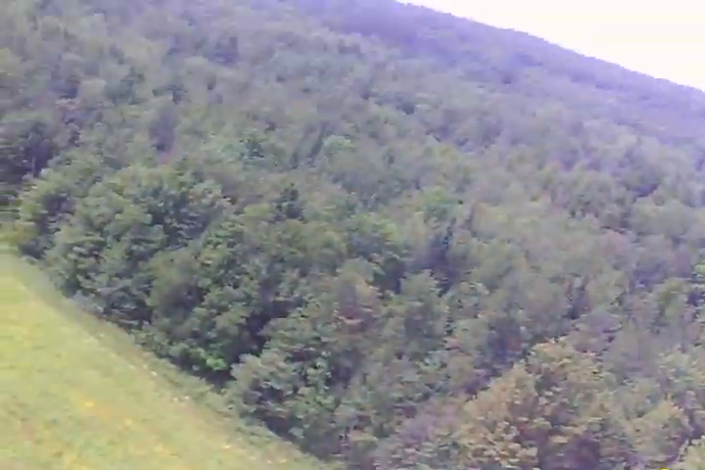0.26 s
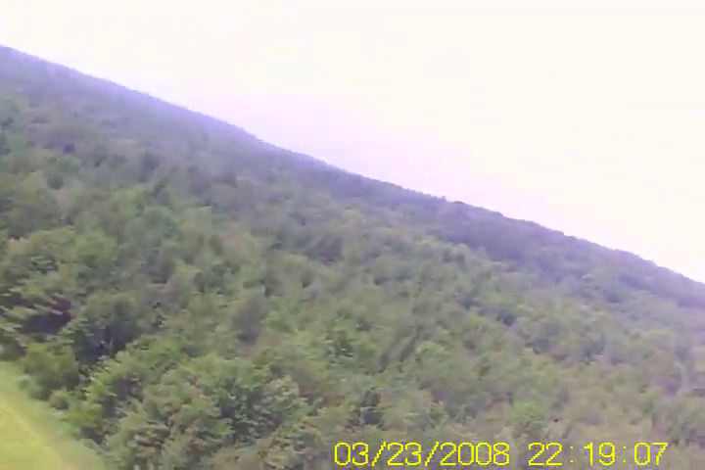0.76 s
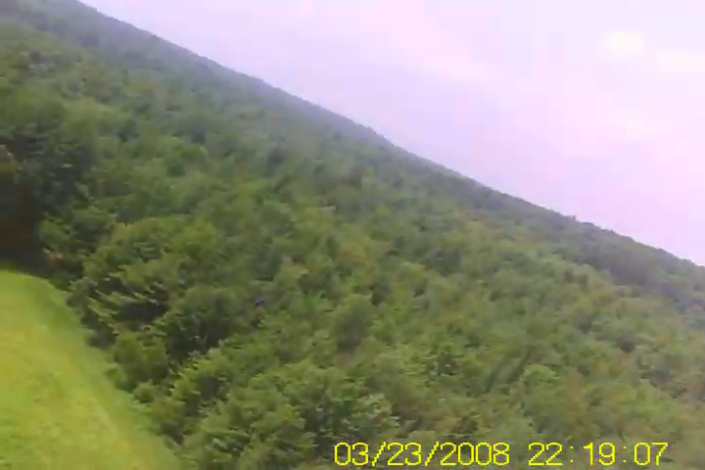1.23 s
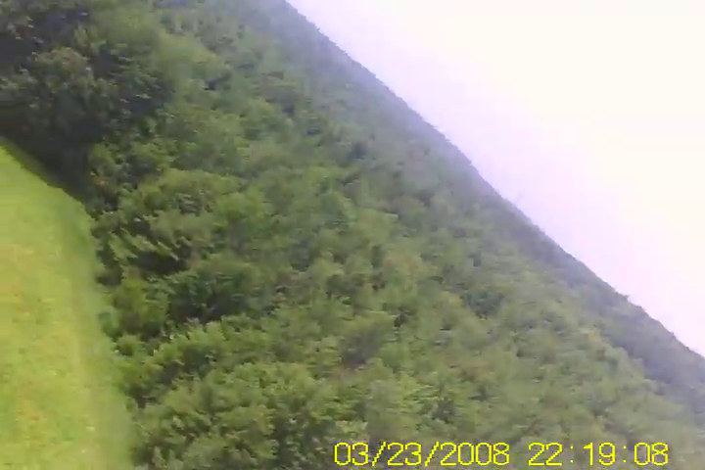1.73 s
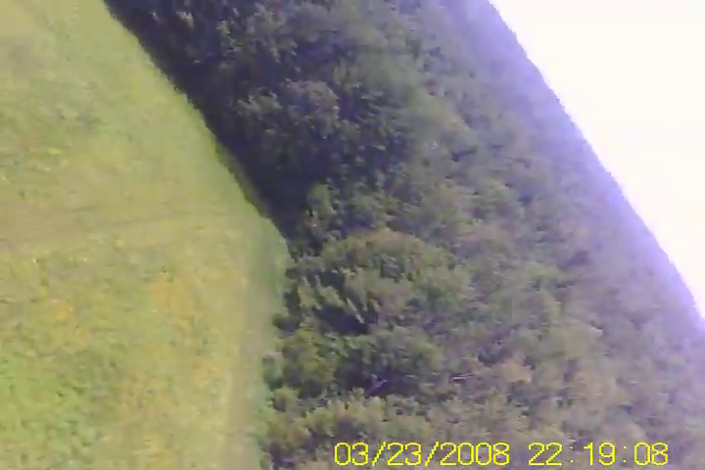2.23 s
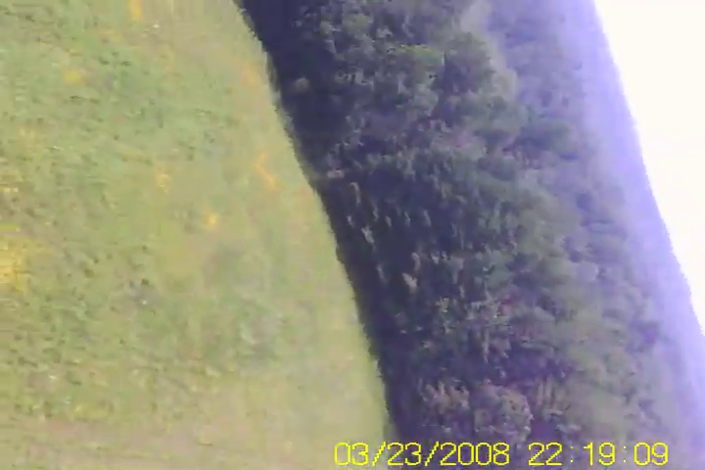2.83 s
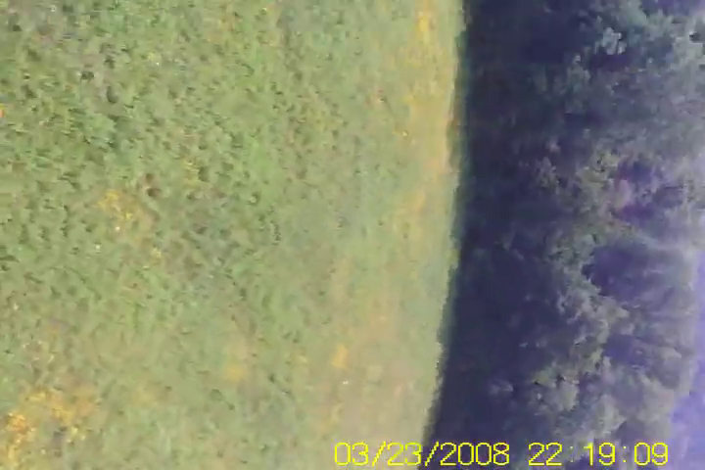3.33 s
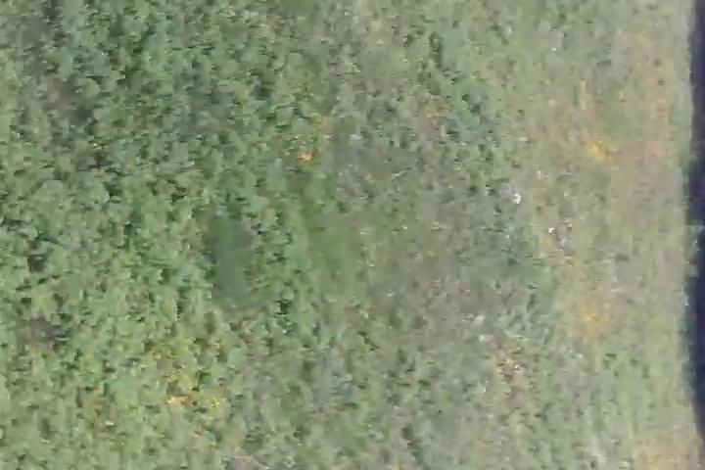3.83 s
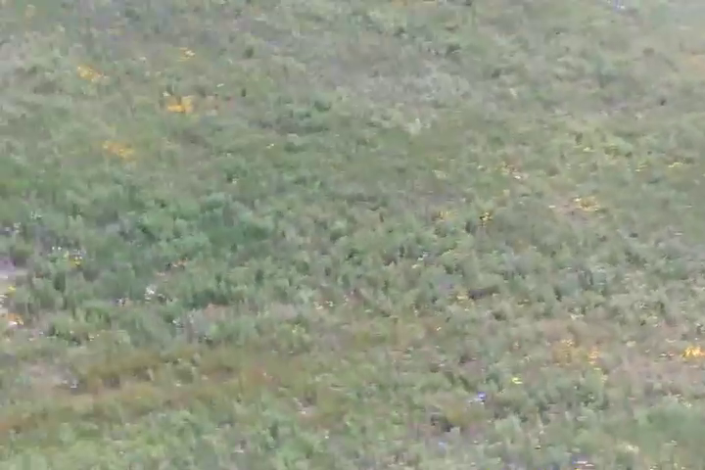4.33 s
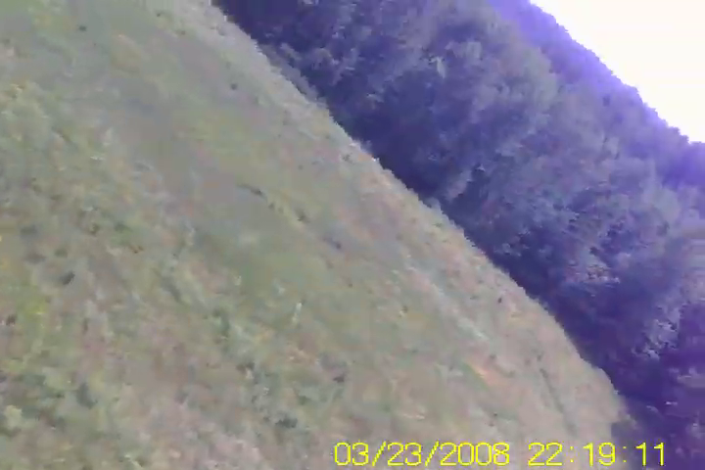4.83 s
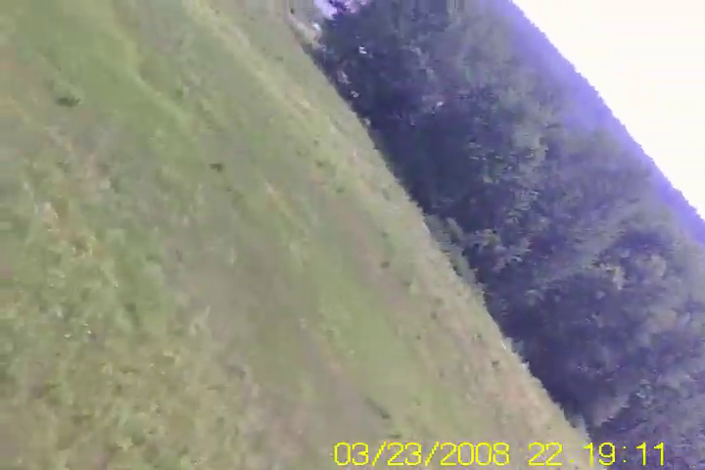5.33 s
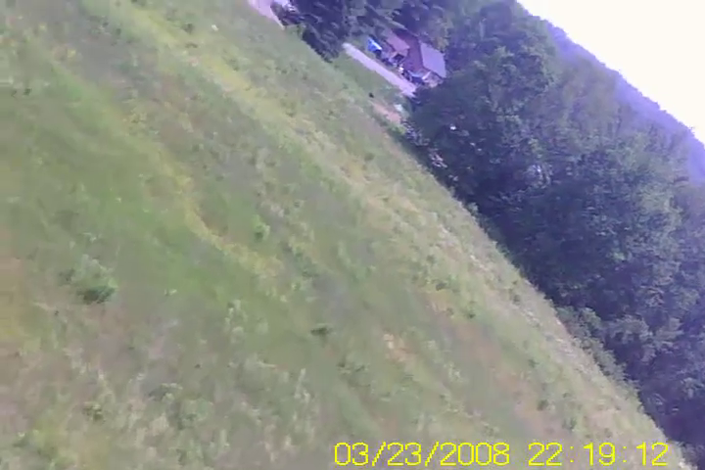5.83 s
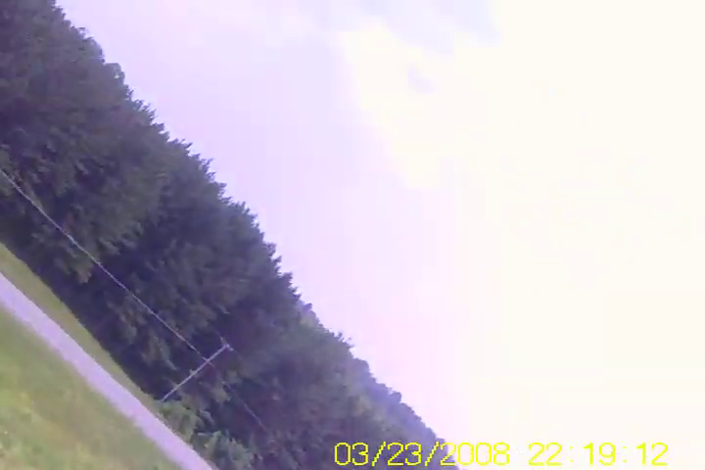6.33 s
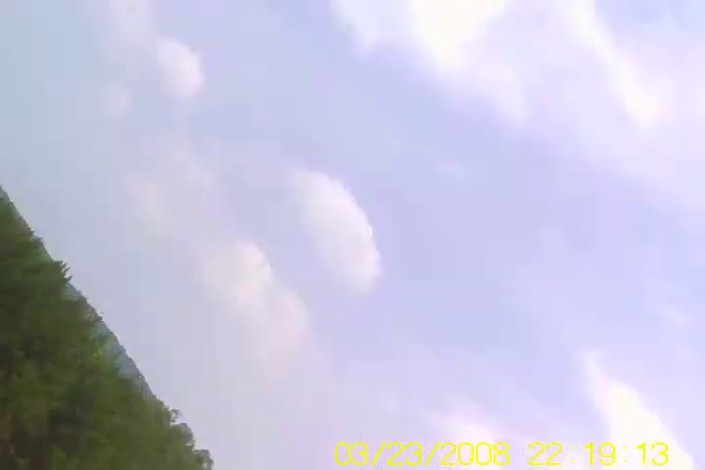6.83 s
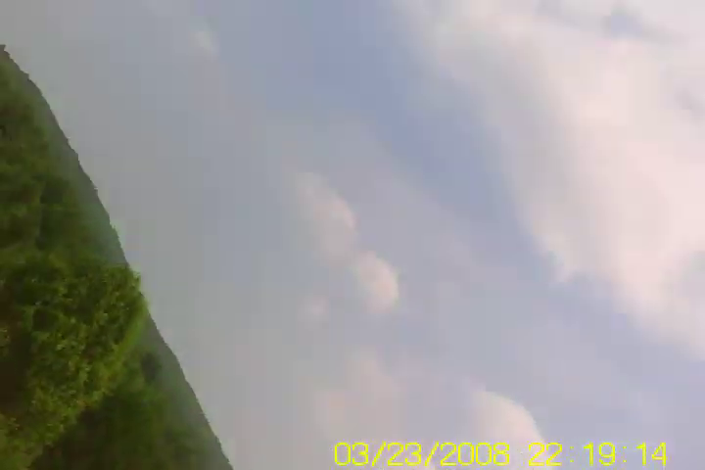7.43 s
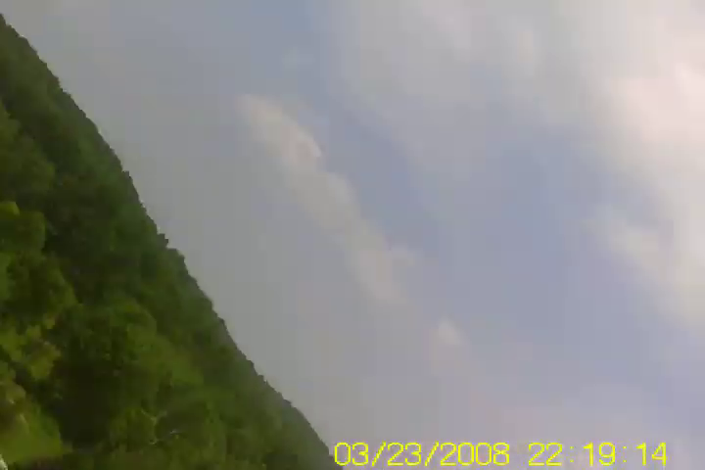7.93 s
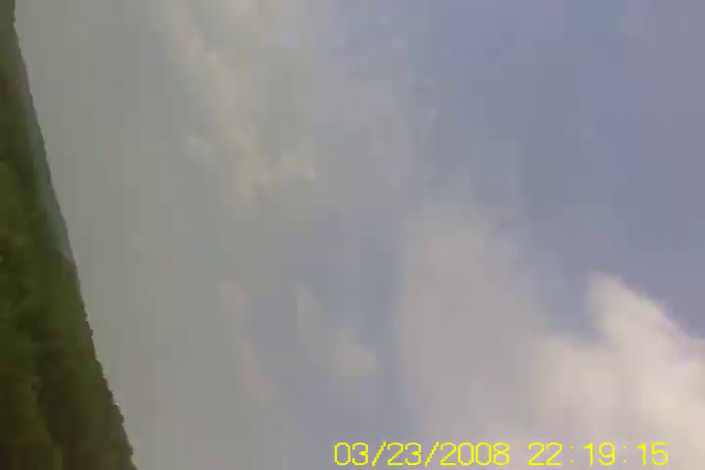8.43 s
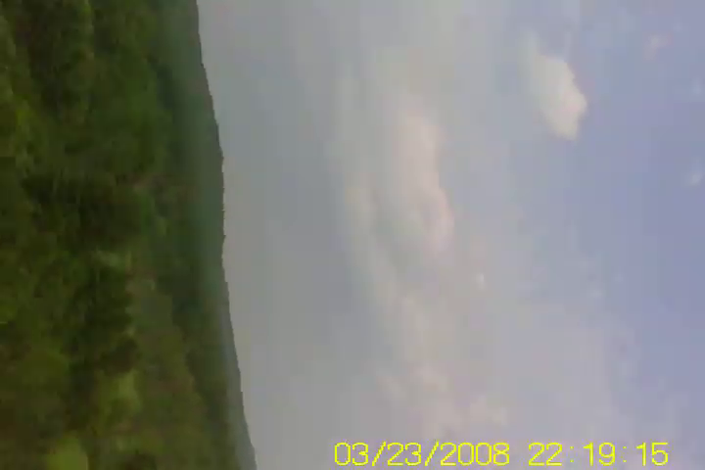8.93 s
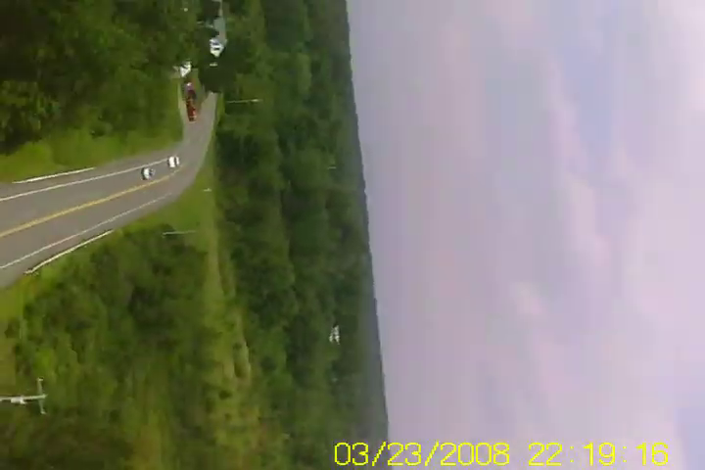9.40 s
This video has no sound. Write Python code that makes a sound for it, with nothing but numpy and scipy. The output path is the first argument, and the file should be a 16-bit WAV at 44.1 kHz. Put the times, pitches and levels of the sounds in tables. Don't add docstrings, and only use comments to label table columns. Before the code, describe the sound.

A microphone riding on a small electric model aircraft hears everything close and rough. From 0 s a steady propeller buzz near 500 Hz, with higher motor whine and airframe rattle-like hiss, sits in rumbling, buffeting wind. At about 0.9 s a gust thumps with a sharp digital click and the level drops suddenly, then climbs back in small steps until around 4.2 s. A low airy hum joins from about 1.6 to 3.3 s; from 2.8 s the turbulence becomes harsher and more hollow, and the propeller tone weakens around 4 s. At 4.35-4.5 s the motor revs quickly about a tenth higher in pitch, with a dominant piercing whine near 3.3 kHz. A heavy gust at 5 s lowers the level again. The whine holds, sagging slightly, through wind hiss, fine crackle and thumps around 5.8, 6.35, 7.1-7.4 and 9 s, ending abruptly near 9.7 s still running.

```python
import sys
import numpy as np
from scipy import signal
from scipy.fft import rfft, irfft, next_fast_len
from scipy.io import wavfile
from scipy.ndimage import uniform_filter1d, map_coordinates

SR = 44100
rng = np.random.default_rng(int(sys.argv[2]) if len(sys.argv) > 2 else 0)


def master_out(mix):
    frames = np.transpose(np.atleast_2d(mix))
    ceiling = np.clip(frames, -1, 1)
    pcm = np.round(ceiling * 32767).astype(np.int16)
    wavfile.write(sys.argv[1], SR, pcm)


def undo_db(level):
    steps = np.asarray(level, float) / 20
    return 10 ** steps


N = 426006
TIME = np.arange(N) / SR

# [t/s, f/Hz]
BLADE_RATE = [(0, 503), (3.15, 501.15), (3.45, 501.45), (4, 501.7), (4.33, 501.5), (4.36, 511.2),
              (4.39, 527.8), (4.42, 544.2), (4.45, 552.9), (4.48, 556.1), (4.52, 557.4), (4.6, 558),
              (5.1, 556.8), (5.7, 556.1), (6.6, 553.8), (9, 548.5), (9.66, 547.4)]
# [t/s, level/dB]
AIRSPEED = [(0, 0.16), (.8, -1.1), (1, .1), (1.4, -0.5), (2.2, 0.2), (3.6, 2.5), (4.6, 3.5), (5.1, 1),
            (6.2, 2.5), (6.8, -0.2), (7.15, 1.9), (7.5, 0.3), (8.7, -0.1), (9.4, .6), (9.66, 0.2)]


def unit(x):
    return x / np.sqrt(np.mean(x ** 2) + 1e-20)


def curves(rows):
    s, *cols = np.transpose(rows)
    return [np.interp(TIME, s, c) for c in cols]


def wobble(rate_hz):
    knots = rng.standard_normal(int(N * rate_hz / SR) + 4)
    return map_coordinates(knots, [TIME * rate_hz])


def bumps(rows):
    return sum(height * .5 ** ((2 * (TIME - s) / width) ** 2) for s, height, width in rows)


def coloured(x, points):
    m = next_fast_len(N + 8192)
    hz, db = np.transpose(points)
    log_f = np.log(np.fft.rfftfreq(m, 1 / SR) + .5)
    gain = undo_db(np.interp(log_f, np.log(hz + .5), db))
    return irfft(rfft(x, m) * gain, m)[..., :N]


def rush(points, patchy_db):
    z = signal.stft(rng.standard_normal(N), nperseg=512)[2]
    field = uniform_filter1d(rng.standard_normal(z.shape), size=6, axis=0)
    field = uniform_filter1d(field, size=12, axis=1)
    patchy = signal.istft(z * undo_db(patchy_db * unit(field)), nperseg=512)[1][:N]
    return unit(coloured(patchy, points))


def narrow(hz, width_hz):
    swing = wobble(width_hz) + 1j * wobble(width_hz)
    phase = 2 * np.pi * np.cumsum(hz + 0 * TIME) / SR
    return unit((swing * np.exp(1j * phase)).real)


def shaft():
    return 2 * np.pi * np.cumsum(curves(BLADE_RATE)[0]) / SR


def throttle():
    cruise_hz, full_hz = 503, 547
    return np.clip((curves(BLADE_RATE)[0] - cruise_hz) / (full_hz - cruise_hz), 0, 1)


def drive():
    # [multiple, pole tone index 0-3, level re pole tone/dB]
    side_tones = [(5.005, 2, -13.5), (7.01, 0, -11.5), (8.02, 0, -14.5), (11, 2, -14), (17, 2, -27),
                  (22, 0, -30)]
    turn = shaft() + 0.034 * wobble(20)
    propeller, poles = np.split(tone_levels(), 2)
    blades = sum(tone(turn, k + 1, db, flutter=0.12, blur=0.072) for k, db in enumerate(propeller))
    whine = sum(tone(turn, k, db, flutter=0.045, blur=0.15) for k, db in zip((6, 9, 12, 18), poles))
    sides = sum(tone(turn, k, poles[round(col)] + db, flutter=0.24, blur=0.11) for k, col, db in side_tones)
    return blades + whine + sides


def tone(turn, multiple, db, flutter, blur):
    carrier = np.exp(1j * (multiple * turn + 2 * np.pi * rng.random()))
    skirt = wobble(250) + 1j * wobble(250) + 0.89 * (wobble(600) + 1j * wobble(600))
    modulation = 1 + flutter * wobble(30) + blur * skirt
    return np.sqrt(2) * undo_db(db) * (carrier * modulation).real


def tone_levels():
    # [t/s, load/dB]
    load_curve = [(0, -3), (.9, -2.5), (1.1, -.5), (2.4, 1.5), (3.4, .8), (3.75, -4), (4.05, -9),
                  (4.3, -11), (4.42, -1.5), (4.9, 1.5), (5.3, 1), (6, -2.5), (6.45, -5.5), (7.2, 4.5),
                  (7.8, -3), (8.45, 1.2), (9.3, -0.5), (9.66, 2)]
    # [t/s, inflow/dB]
    inflow_curve = [(0, .1), (.4, -.5), (.65, -3), (1.05, -5.5), (1.4, -10), (1.8, -17), (2.7, -17),
                    (3.3, -14), (3.8, -23.5), (4.33, -22), (4.43, -21), (4.52, -31), (5.1, -30),
                    (5.45, -24), (6.5, -24), (7.2, -23), (8.8, -21.5), (9.66, -22)]
    # [multiple, level/dB, per load dB, per inflow dB, per dive dB (dB/dB)]
    cruise_tones = [(1, -18, 0.98, 0.04, 0.06), (2, -36.5, -0.06, -.45, -0.3), (3, -28.5, 0.14, 1, 8),
                    (4, -27, .01, 0.9, -2), (6, -37, .5, .1, 3), (9, -38, 0.5, 0, -0.2),
                    (12, -26.5, 0.4, 0.11, -0.46), (18, -42, 0, -.25, -2.6)]
    # [multiple, level/dB, per load dB, per inflow dB, per dive dB (dB/dB)]
    full_tones = [(1, -25.5, 1, .01, .01), (2, -25, .5, -.08, -.8), (3, -42, -0.5, 0, 3.3),
                  (4, -35, 1.7, 0.3, -.4), (6, -8, 0.2, 0.97, 0.14), (9, -56, -2, 1, -1),
                  (12, -32, .15, .05, -.8), (18, -50, -0.2, .15, -2.1)]
    # [tone row, t/s, depth/dB, width/s]
    cancels = [(0, 4.31, -12, .1), (0, 8.07, -12, .25), (1, 3.15, -8, .25), (1, 6.17, -22, .42),
               (1, .4, -8, .3), (1, 4.62, -7, .15), (4, 5.95, -5, .3), (4, 4.3, -6, .14), (1, 5.5, -6, .2),
               (0, 4.1, -6, .12), (4, 5.08, -8, .15), (4, 1.15, -6, .3)]
    (load,), (inflow,), (speed,) = curves(load_curve), curves(inflow_curve), curves(AIRSPEED)
    controls = np.array([np.ones(N), load, inflow, np.maximum(speed, 0)])
    cruise = np.array(cruise_tones)[:, 1:] @ controls
    full = np.array(full_tones)[:, 1:] @ controls
    step_s, strain_db, strain_s = 4.38, 7, .28
    strain = np.maximum(TIME - step_s, 0) / strain_s
    full[-2] += strain_db * strain * np.exp(1 - strain)
    sag_hz = np.clip(558 - curves(BLADE_RATE)[0], 0, 12)
    full[-2] += .3 * sag_hz
    full[-1] += 1.2 * sag_hz
    levels = cruise + throttle() * (full - cruise)
    for row, *dip in cancels:
        levels[round(row)] += bumps([dip])
    return levels


def airframe():
    # [f/Hz, width/Hz, level/dB]
    resonances = [(2400, 220, 2), (5000, 200, 1.5), (5700, 340, 2.5), (6860, 550, 0), (7820, 490, -1.5),
                  (9400, 250, -7)]
    m = next_fast_len(N)
    f = np.fft.rfftfreq(m, 1 / SR)
    modes = 0
    for k, (centre, width, db) in enumerate(resonances):
        damping = 1j * f * width
        modes = modes + (-1) ** k * undo_db(db) * damping / (centre * centre - f * f + damping)
    shaken = unit(irfft(rfft(rng.standard_normal(m)) * modes ** 2, m)[:N])
    return undo_db(-31.5 - 15 * np.clip((TIME - 1.8) / 1.9, 0, 1)) * shaken


def wind():
    # [t/s, level/dB]
    surge = [(0, -4.5), (1, -4), (2.2, -2.5), (2.75, 2), (3.2, 1), (3.5, 4.8), (3.8, 1), (4, 4.5), (4.4, 1),
             (4.6, 4), (4.85, -0.1), (6, 1.5), (6.6, -0.9), (7, -0.5), (7.9, 1.2), (8.7, -1.5), (9.25, 2.5),
             (9.66, 0)]
    # [level/dB, per airspeed dB (dB/dB), per surge dB (dB/dB), rise at full throttle/dB]
    layers = [
        (-20, 0.54, 0.33, 2),
        (-21.5, 0.4, 0.53, -0.65),
        (-21, .01, 0.96, -0.05),
        (-25.5, 1.01, 0, 0.14),
    ]
    controls = [np.ones(N), *curves(AIRSPEED), *curves(surge), throttle()]
    buffet_db, rumble_db, body_db, hiss_db = np.array(layers) @ controls
    low = buffeting(buffet_db, rumble_db) + vortex_hum() + gusts()
    high = port_flow(body_db, hiss_db) + fizz(body_db) + crackle(body_db - 18.5, rate_hz=150)
    return low + high


def buffeting(buffet_db, rumble_db):
    # [f/Hz, level/dB per Hz]
    buffet_colour = [(1, -12), (4, 0.5), (12, 2.5), (30, -4), (70, -8), (110, -16), (200, -42), (400, -120)]
    # [f/Hz, level/dB per Hz]
    rumble_colour = [(30, -60), (70, -3), (110, -0.5), (200, -2), (350, -4), (520, -5.5), (750, -14),
                     (1100, -52), (2000, -120)]
    lumps = wobble(14)
    buffet = unit(undo_db(1.7 * lumps) * rush(buffet_colour, patchy_db=0.36))
    rumble = undo_db(0.92 * lumps) * rush(rumble_colour, patchy_db=0.6)
    return undo_db(buffet_db) * buffet + undo_db(rumble_db - 0.23) * rumble


def gusts():
    # [t/s, height (full scale = 1), width/s]
    pushes = [(0.541, -0.087, 0.013), (0.725, -0.12, 0.02), (0.754, 0.053, 0.012), (0.893, -0.48, 0.012),
              (2.941, -0.28, 0.013), (3.632, -0.33, 0.019), (3.86, 0.58, 0.014), (4.791, 0.44, 0.029),
              (4.999, -0.79, 0.014), (5.822, -0.53, 0.014), (6.35, -0.37, 0.011), (7.099, -0.9, 0.0086),
              (7.142, 0.58, 0.016), (7.304, -0.38, 0.015), (7.36, 0.4, 0.03), (9.026, 0.34, 0.031)]
    return bumps(pushes)


def vortex_hum():
    from_s, to_s, rise_db_per_s, fall_db_per_s = 1.6, 3.3, 11.5, 18
    fade_db = np.maximum(rise_db_per_s * (from_s - TIME), fall_db_per_s * (TIME - to_s))
    hum_db = np.maximum(-28.5 - np.maximum(fade_db, 0), -45)
    return undo_db(hum_db) * narrow(235, width_hz=110)


def port_flow(body_db, hiss_db):
    # [f/Hz, level/dB per Hz]
    slow_colour = [(250, -60), (480, -11), (650, -1), (900, -3), (1300, -7), (1800, -8), (2400, -24),
                   (4000, -90)]
    # [f/Hz, level/dB per Hz]
    fast_colour = [(250, -65), (550, -4.5), (800, -1.5), (1050, -2.5), (1270, -2.5), (1600, -3.5),
                   (2100, -9.5), (2800, -14), (4500, -92)]
    # [f/Hz, level/dB per Hz]
    hiss_colour = [(900, -60), (1800, -4), (2500, -2), (3500, -1), (5000, -5), (6500, -7), (7500, -10),
                   (8500, -13.5), (9700, -14), (12500, -19.5)]
    eddies_db = 0.27 * wobble(12) + 0.39 * wobble(90) + 0.49 * wobble(300)
    ringing = np.clip((body_db + 25.5) / 4, 0, 1)
    slow = np.sqrt(1 - ringing) * rush(slow_colour, patchy_db=1.0)
    fast = np.sqrt(ringing) * rush(fast_colour, patchy_db=1.02)
    body = slow + fast + ringing * cavity_ring()
    hiss = (1 + .15 * np.cos(shaft())) * rush(hiss_colour, patchy_db=0.3)
    return undo_db(eddies_db) * (undo_db(body_db + 0.57) * body + undo_db(hiss_db - 0.72) * hiss)


def cavity_ring():
    # [t/s, f/Hz]
    cavity = [(0, 940), (2.2, 944), (3.3, 1150), (4.4, 1280), (6, 1398), (7, 1300), (9.66, 1270)]
    # [t/s, level/dB, width/s]
    ring_gusts = [(2.78, 6, .14), (3.0, 6, .09), (3.38, 4, .1), (3.53, 6, .13), (4.08, 4, .1),
                  (4.56, 4, .1), (5.95, 6, .12), (8.2, 4, .15), (9.25, 4, .15)]
    ring_hz, = curves(cavity)
    return undo_db(-9.5 + 1.8 * wobble(7) + bumps(ring_gusts)) * narrow(ring_hz, width_hz=330)


def fizz(body_db):
    # [f/Hz, level/dB per Hz]
    fizz_colour = [(5000, -60), (8000, -12), (9500, -1), (11000, 0), (13000, -0.5)]
    bursts_db = 3.8 * wobble(250) + 2.0 * wobble(40)
    spray = unit(undo_db(bursts_db) * rush(fizz_colour, patchy_db=1.0))
    return undo_db(.8 * (body_db + 21.5) - 38.5) * spray


def crackle(db, rate_hz):
    # [f/Hz, level/dB per Hz]
    pop_colour = [(500, -40), (1500, -4), (3000, -2), (6000, -3), (13000, -4)]
    when, size, sign = rng.random((round(rate_hz * N / SR), 3)).T
    heights = np.sign(sign - .5) * undo_db(-4 * np.log(size + 0.0037))
    pops = np.bincount((when * N).astype(int), heights, N)
    return undo_db(db) * unit(coloured(pops, pop_colour))


def scene():
    return (drive() + airframe() + wind())[None]


def top_cut(x):
    return signal.sosfilt(signal.butter(12, 15800, fs=SR, output="sos"), x)


def record(dry):
    # [t/s, change/dB]
    gain_steps = [
        (.902, -13),
        (1.364, 1.5),
        (1.848, 1.5),
        (2.339, 1.5),
        (2.93, 0.77),
        (3.693, 1.5),
        (4.174, 1.13),
        (5.013, -5.5),
        (5.822, 1),
    ]
    # [f/Hz, level/dB]
    low_pass = [(9000, 0), (10000, -1), (10600, -6), (11200, -10.5), (11700, -16.5), (12000, -24),
                (12250, -32), (12400, -60), (13000, -120)]
    # [t/s, top (full scale = 1), width/s]
    overflows = [
        (.891712, .93, .000085),
        (.893743, .8, .000055),
    ]
    gain_db = sum(change_db * (TIME >= s) for s, change_db in gain_steps)
    x = (dry - 0.0082) * undo_db(gain_db)
    x = coloured(np.clip(x, -.71, .71), low_pass) - .004
    for s, top, width in overflows:
        x = x + (top - x) * np.exp(-(2 * (TIME - s) / width) ** 2)
    return top_cut(x)


dry = scene()
out = record(dry)
master_out(out)
```